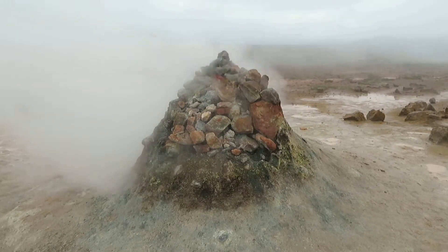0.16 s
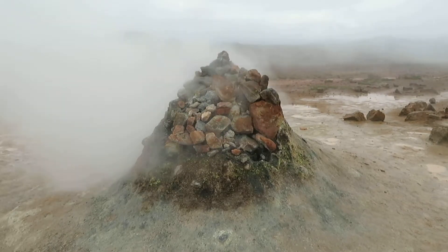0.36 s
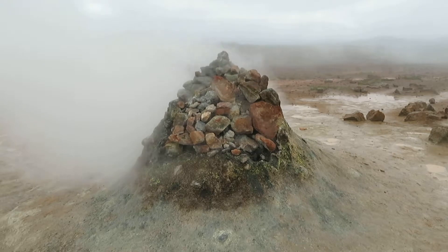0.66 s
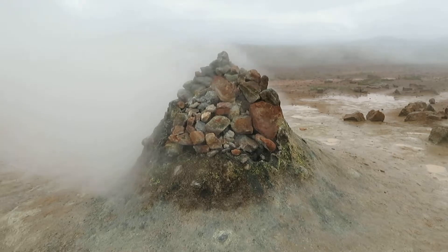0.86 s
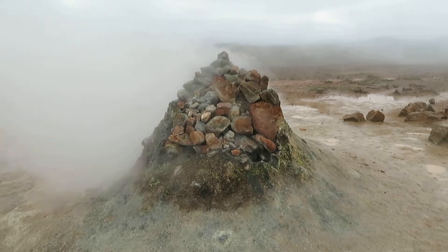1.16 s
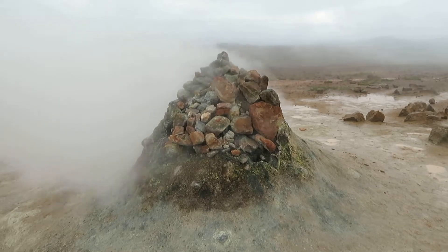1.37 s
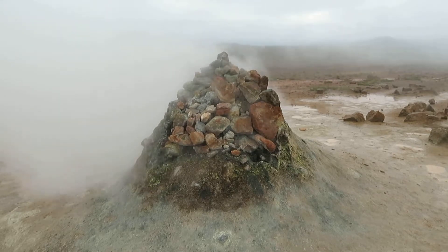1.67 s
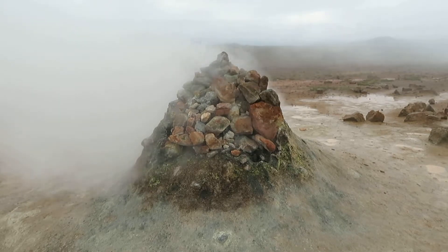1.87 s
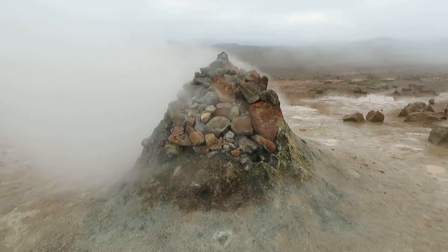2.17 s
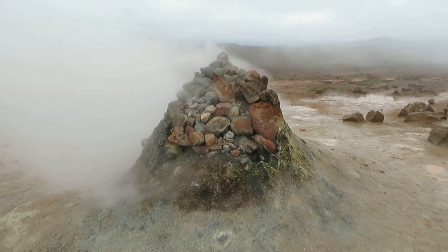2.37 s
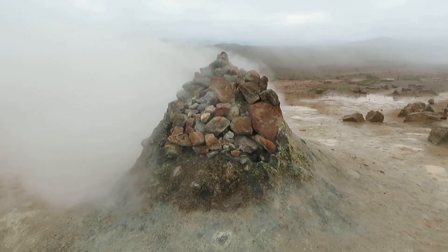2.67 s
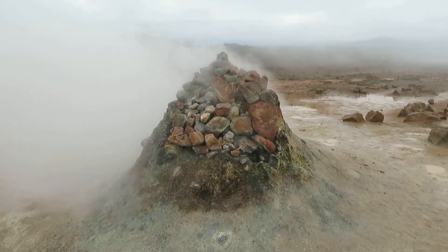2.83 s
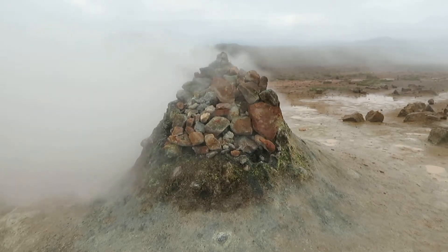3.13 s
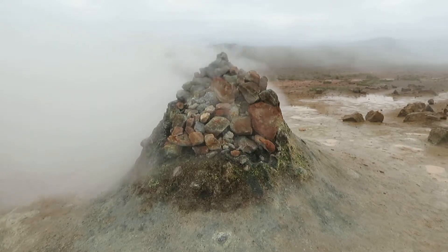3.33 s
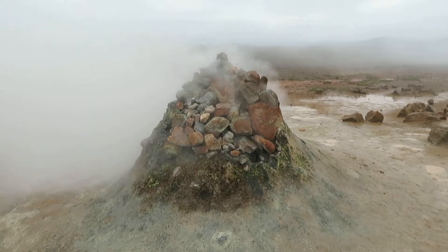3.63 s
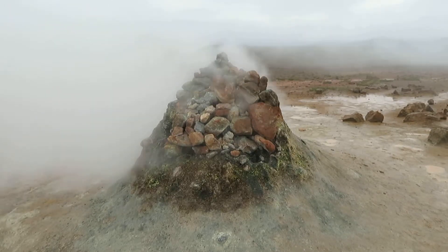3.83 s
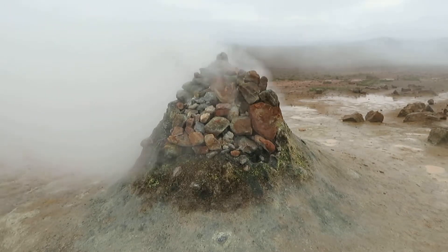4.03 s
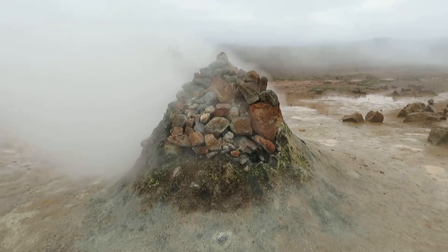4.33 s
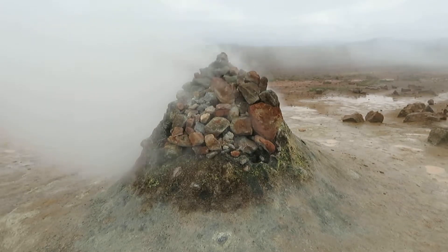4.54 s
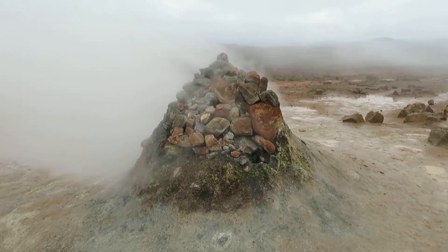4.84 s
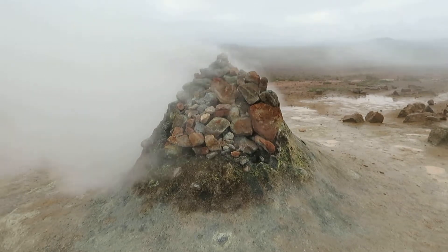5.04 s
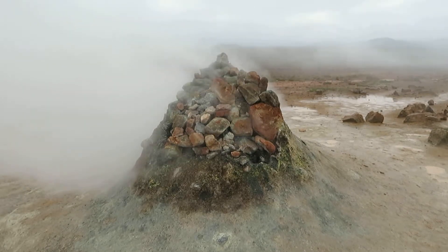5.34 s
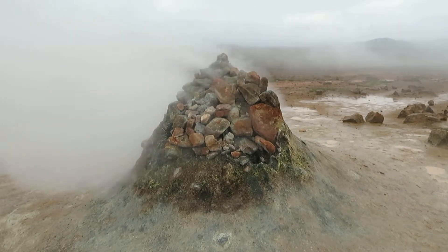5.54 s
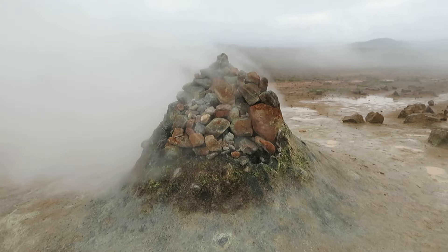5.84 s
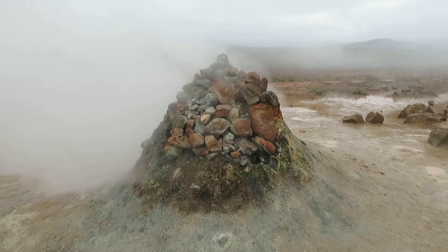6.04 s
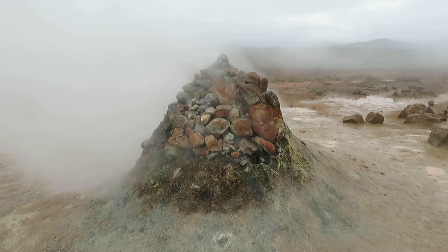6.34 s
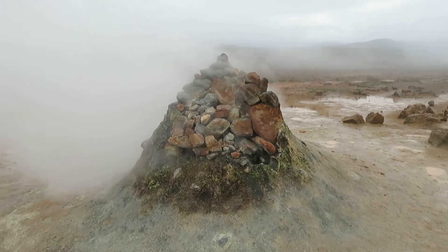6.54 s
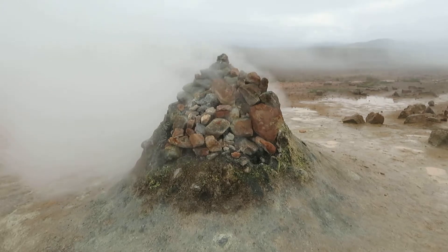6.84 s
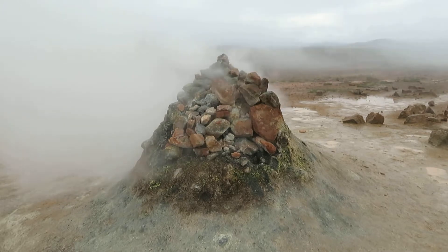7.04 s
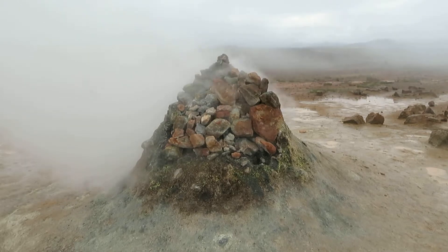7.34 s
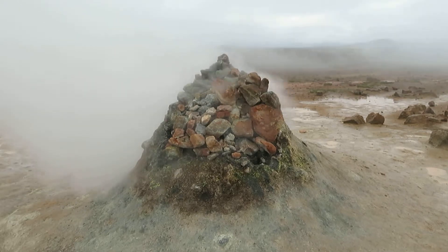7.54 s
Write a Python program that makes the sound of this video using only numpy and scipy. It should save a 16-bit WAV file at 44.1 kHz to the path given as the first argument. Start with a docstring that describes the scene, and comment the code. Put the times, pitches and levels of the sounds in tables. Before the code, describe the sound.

A steady rush of steam escapes between stones, heard close by in the open air. The hollow midrange roar drifts a little in pitch, and fine hiss surges irregularly above it. Deep wind rumble and buffeting press on the microphone throughout, with stronger fluttering gusts after five and near seven seconds. Two dry drop clicks come quickly together slightly after three seconds. Wide stereo, no reverberation.

```python
"""Fumarole under a cairn

A fumarole vents through a cairn of stones, heard from a few metres away on open, windy ground.
The wind buffets the microphone: noise in three bands, each following its own level curve.
The shaft roars, its noise raised at hollow resonances; steam hisses in surges between the stones
under a fine fizz, both made of shaped noise. A few drops of condensed steam tap on the housing
of the microphone: decaying modes, coloured by the contact, one rebound and the struck spot."""
import sys
import numpy as np
from scipy import signal
from scipy.fft import rfft, irfft, next_fast_len
from scipy.io import wavfile
from scipy.ndimage import uniform_filter1d, map_coordinates

SR = 44100
rng = np.random.default_rng(int(sys.argv[2]) if len(sys.argv) > 2 else 0)


def master_out(mix):
    """Clip the mix to full scale and print it as 16-bit PCM to the path in sys.argv[1]."""
    frames = np.transpose(np.atleast_2d(mix))
    ceiling = np.clip(frames, -1, 1)
    pcm = np.round(ceiling * 32767).astype(np.int16)
    wavfile.write(sys.argv[1], SR, pcm)


N = 339570


def amp(db):
    """Level: decibels to an amplitude ratio."""
    return 10 ** (np.asarray(db) / 20)


def unit(x):
    """Normalisation: scale to an rms of 1."""
    return x / np.sqrt(np.mean(x ** 2) + 1e-20)


def along(points, hz):
    """Log-frequency interpolation: each column of a table after the frequency, read at hz."""
    f, *columns = np.transpose(points)
    return [np.interp(np.log(hz + 1), np.log(f + 1), column) for column in columns]


def curves(rows):
    """Linear interpolation in time: one value per sample for each column after the time."""
    s, *columns = np.transpose(rows)
    return [np.interp(np.arange(N) / SR, s, column) for column in columns]


def wobble(rate):
    """Random modulation: a smooth curve through normal random knots, rate knots a second."""
    knots = rng.standard_normal(int(N * rate / SR) + 4)
    return map_coordinates(knots, [np.arange(N) * rate / SR])


def filtered(x, response):
    """Linear filtering: the spectrum of x times a response of frequency."""
    size = x.shape[-1]
    m = next_fast_len(size + SR // 2)
    spectrum = rfft(x, m) * response(np.fft.rfftfreq(m, 1 / SR))
    return irfft(spectrum, m)[..., :size]


def rush(spectrum, image, patchy_db, steady_s=.15):
    """Turbulence noise: stereo, evened to rms 1 over about steady_s; eddies make its gain patchy."""
    z = signal.stft(rng.standard_normal((2, N)), nperseg=512)[2]
    field = rng.standard_normal(z.shape[1:])
    field = uniform_filter1d(field, size=8, axis=0)  # across frequency
    field = uniform_filter1d(field, size=12, axis=1)  # across time
    pair = signal.istft(z * amp(patchy_db * unit(field)), nperseg=512)[1][:, :N]

    def mix(hz):
        """Partial correlation: shares of a common and an opposed noise set the likeness of the sides."""
        half_turn = np.arccos(np.clip(along(image, hz)[0], 0, 1)) / 2
        return amp(along(spectrum, hz)[0]) * [np.cos(half_turn), np.sin(half_turn)]

    def ports(hz):
        """Interaural-style differences: phase lead and level, half on each side."""
        _, lead, balance_db = along(image, hz)
        left = amp(balance_db / 2) * np.exp(.5j * lead)
        return np.array([left, 1 / left])

    shared, apart = filtered(pair, mix)
    noise = filtered(np.array([shared + apart, shared - apart]), ports)
    span = max(int(steady_s * SR), 2)
    power = uniform_filter1d(np.mean(noise ** 2, axis=0), span)
    power = uniform_filter1d(power, span)
    return noise / np.sqrt(np.abs(power) + 1e-20)


# levels of the large slow eddies, the buffeting and the sharp gusts, before trim:
# (time [s], level [dB])
EDDY_LEVELS = [(0.0, -30), (0.4, -33), (0.6, -31), (0.85, -28), (1.12, -28), (1.3, -30), (1.87, -28.5),
               (2.15, -31), (2.4, -26), (2.6, -31.5), (3.1, -29.5), (3.38, -36.5), (3.58, -28.5),
               (4.0, -31), (4.15, -30.5), (4.85, -27), (5.05, -28), (5.66, -25.5), (5.8, -31), (6.2, -31),
               (6.5, -30.5), (6.77, -25), (6.92, -36), (7.05, -25), (7.47, -31.5), (7.64, -25), (7.7, -28)]
BUFFET_LEVELS = [(0.0, -23.5), (0.19, -19.5), (0.33, -24), (0.53, -20), (0.7, -22.5), (1.15, -23.5),
                 (1.35, -25.5), (1.72, -22.5), (1.86, -22), (2.0, -23), (2.27, -23), (2.42, -20.5),
                 (2.8, -22), (3.0, -21), (3.22, -21), (3.45, -23), (3.6, -21.5), (4.1, -22), (4.65, -23),
                 (4.77, -20), (5.02, -24.5), (5.12, -20), (5.3, -24.5), (5.52, -21.5), (5.72, -22),
                 (5.87, -20), (6.05, -24), (6.25, -25.5), (6.5, -22), (6.75, -20), (6.84, -24.5),
                 (6.93, -18), (7.11, -20.5), (7.27, -20.5), (7.55, -19.5), (7.7, -21.5)]
GUST_LEVELS = [(0.0, -28), (0.28, -29.5), (0.55, -29.5), (0.82, -25), (1.0, -29.5), (1.17, -26),
               (1.33, -30.5), (1.55, -27.5), (1.77, -31.5), (1.92, -27.5), (2.24, -31), (2.52, -25.7),
               (2.8, -26.5), (3.1, -31.5), (3.25, -25), (3.78, -29.5), (3.95, -25), (4.1, -29), (4.33, -25),
               (4.52, -30.5), (4.7, -25.5), (4.88, -30), (5.12, -21), (5.22, -30), (5.32, -23),
               (5.45, -27.5), (5.63, -25.5), (6.0, -27.5), (6.33, -27), (6.46, -25), (6.8, -25),
               (6.93, -25), (7.1, -21.5), (7.3, -22), (7.55, -25.5), (7.7, -24)]
# relative spectra of the three bands: (frequency [Hz], level [dB])
RUMBLE_SPECTRUM = [(10, -21.5), (22, -15), (45, -7), (65, -3.5), (85, -0.5), (105, -8), (140, -35.5),
                   (500, -120)]
BUFFET_SPECTRUM = [(50, -23), (80, -11.5), (100, -2.5), (118, 0.5), (150, -1.5), (205, -2.5), (245, -7.5),
                   (300, -14.5), (500, -45.5), (1700, -120)]
FLUTTER_SPECTRUM = [(120, -30), (200, -7.5), (255, -0.5), (320, -2), (440, -8), (600, -19.5), (850, -23.5),
                    (1100, -28), (1400, -44), (2500, -74), (6000, -120)]
# stereo image of the wind:
# (frequency [Hz], left-right likeness [0 to 1], left lead [rad], left-right difference [dB])
WIND_STEREO = [(30, 0.995, 0, 0.3), (70, 0.99, 0, 1), (115, 0.91, -0.12, 2), (162, 0.79, -0.6, 2.1),
               (246, 0.9, -1.13, 0.5), (340, 0.73, -1.58, -0.3), (460, 0.79, -1.78, -0.5),
               (1110, 0.83, -3, -2.5)]
RUMBLE_TRIM_DB, BUFFET_TRIM_DB, FLUTTER_TRIM_DB = 0.7, -0.82, -1.17


def wind():
    """Eddy scales: large eddies rumble, smaller ones buffet and sharp gusts flutter at higher pitch."""
    eddy_db, = curves(EDDY_LEVELS)
    buffet_db, = curves(BUFFET_LEVELS)
    gust_db, = curves(GUST_LEVELS)
    rumble = rush(RUMBLE_SPECTRUM, WIND_STEREO, patchy_db=0.5, steady_s=0.14)
    buffet = rush(BUFFET_SPECTRUM, WIND_STEREO, patchy_db=0.04, steady_s=0.18)
    flutter = rush(FLUTTER_SPECTRUM, WIND_STEREO, patchy_db=1.55, steady_s=0.12)
    return (amp(eddy_db + RUMBLE_TRIM_DB) * rumble
            + amp(buffet_db + BUFFET_TRIM_DB) * buffet
            + amp(gust_db + FLUTTER_TRIM_DB) * flutter)


# flow in the shaft, roar before trim and wobble: (time [s], level [dB])
SHAFT_LEVELS = [(0.0, -35), (1.65, -34.5), (2.35, -36.5), (3.1, -34), (3.45, -36.5), (3.9, -32.5),
                (4.15, -35), (4.9, -34), (6.0, -35.5), (6.32, -34), (6.6, -35), (7.25, -35.5), (7.7, -36.5)]
# hollow notes of the shaft, before drift and swing:
# (frequency [Hz], width at half amplitude [Hz], level over the broad roar [dB])
HOLLOW_NOTES = [(525, 51, 5), (680, 44, 2.4), (780, 56, 3.5)]
# relative spectrum of the broad roar: (frequency [Hz], level [dB])
ROAR_SPECTRUM = [(200, -24), (400, -8), (480, -1.5), (580, 0.5), (640, -4), (735, -7.5), (850, -9),
                 (950, -14), (1050, -27), (1250, -30), (2500, -73), (5000, -120)]
# stereo image of the roar:
# (frequency [Hz], left-right likeness [0 to 1], left lead [rad], left-right difference [dB])
ROAR_STEREO = [(466, 0.71, -2, -2), (522, 1, 0.1, -3.5), (577, 0.69, -0.8, -4), (681, .35, -0.8, -9),
               (716, 0.3, -3, -6), (800, .35, -2.5, -7.5), (893, 0.37, -3, -2.5), (964, 0.83, -3, 5),
               (1060, 0.72, -3.5, 0)]
NOTE_SWING_DB, NOTE_KNOTS_PER_S = 1.2, 22
DRIFT_SHARE, DRIFT_KNOTS_PER_S = .016, 6  # share of the pitch


def shaft():
    """Resonance: rushing steam roars and sounds the shaft's hollow notes, which drift, swell and fade."""
    roar_db, = curves(SHAFT_LEVELS)
    broad = rush(ROAR_SPECTRUM, ROAR_STEREO, patchy_db=1.8, steady_s=0.077)
    roar = broad.copy()
    for centre, width, db in HOLLOW_NOTES:
        note = filtered(broad, lambda hz: 1 / (1 + ((hz - centre) / (width / 2)) ** 2))
        note_db = db + NOTE_SWING_DB * wobble(NOTE_KNOTS_PER_S)
        roar += (amp(note_db) - 1) * note  # the broad roar already holds the note once
    # reading at an uneven pace bends the pitch of the whole roar
    clock = np.cumsum(1 + DRIFT_SHARE * wobble(DRIFT_KNOTS_PER_S))
    drifting = np.array([map_coordinates(side, [clock], order=3, mode="mirror") for side in roar])
    return amp(roar_db - 0.33 + 1.63 * wobble(55)) * unit(drifting)


# surges between the stones, hiss before trim and sputter: (time [s], level [dB])
SURGE_LEVELS = [(0.0, -41), (0.06, -44.5), (0.15, -39.4), (0.26, -45.5), (0.36, -43), (0.5, -47),
                (0.65, -41.5), (0.73, -42.8), (0.86, -44), (1.05, -44), (1.16, -42), (1.38, -43.5),
                (1.61, -43.5), (1.7, -46), (1.78, -44), (1.96, -45.3), (2.2, -44.5), (2.28, -44),
                (2.4, -42.5), (2.5, -44), (2.98, -42.5), (3.14, -45.5), (3.46, -45), (3.69, -42),
                (3.83, -42), (4.0, -45), (4.23, -41), (4.38, -46.5), (4.47, -42), (4.65, -44.5),
                (4.77, -42), (4.95, -44), (5.09, -43), (5.61, -43), (5.71, -45), (6.15, -43), (6.33, -44),
                (6.47, -43.5), (6.6, -45.5), (6.94, -43), (7.06, -44.5), (7.16, -41.5), (7.34, -44.5),
                (7.7, -45)]
# relative spectra of the jets and the fizz: (frequency [Hz], level [dB])
HISS_SPECTRUM = [(800, -46.5), (1120, -7), (1300, -4), (1420, -8.5), (1590, 0.5), (1900, -2), (2400, -1.95),
                 (2560, -5), (2850, -2.5), (3200, -11.5), (3450, -7.5), (3800, -12), (4300, -8),
                 (5000, -12.5), (5700, -33), (8000, -73.5)]
FIZZ_SPECTRUM = [(4000, -24.5), (5400, 1), (7400, -4.5), (9100, -8), (10500, -10.5), (13000, -16),
                 (15000, -22)]
# stereo images of the jets and the fizz:
# (frequency [Hz], left-right likeness [0 to 1], left lead [rad], left-right difference [dB])
HISS_STEREO = [(1150, .8, 3, 0.5), (1260, 0.28, 1.5, 7.5), (1330, 0.96, -0.25, 7), (1410, .45, 2, 2),
               (1534, 0.75, 1, 8.5), (1620, 0.87, 0.83, 6), (1800, 1, 0.1, -0.5), (2020, 1, -0.4, 2),
               (2200, 0.99, 1.3, 0.5), (2480, 1, -0.86, 0.5), (3000, 0.97, 0.5, 0), (3300, 0.76, 0.46, 2.5),
               (3660, 0.87, 0.2, 0.5), (4270, 0.83, 1.03, 2.4), (4950, 0.87, 0.3, 1)]
FIZZ_STEREO = [(5900, 0.3, .3, 0.002), (7200, .23, 0, 0.0032), (10000, .42, 0, 0), (15000, .65, 0, 0)]


def steam():
    """Jet noise: jets between the stones surge and sputter; a fine fizz follows them only weakly."""
    hiss_db, = curves(SURGE_LEVELS)
    sputter_db = 0.67 * wobble(40)
    jets = rush(HISS_SPECTRUM, HISS_STEREO, patchy_db=1.14, steady_s=0.091)
    fizz = rush(FIZZ_SPECTRUM, FIZZ_STEREO, patchy_db=1.1, steady_s=.2)
    surge_db = hiss_db - hiss_db.mean() + sputter_db
    return amp(hiss_db + 0.4 + sputter_db) * jets + amp(-62.0 + .2 * surge_db) * fizz


# drops on the housing: (time [s], peak level [dB], brightness [dB per octave], rebound delay [s],
# region that the struck spot favours [Hz], its gain [dB], region that it mutes [Hz], its gain [dB])
DROP_TAPS = [(0.8511, -31, 9, 0.0019, 2100, 0, 4000, -7), (3.2839, -3.5, 0, 0.00154, 1850, 1, 4020, -1),
             (3.3706, -10.5, 3, 0.0012, 2030, 8, 4000, -7), (7.3293, -35, 10, 0.0014, 2100, 0, 4000, -6)]
# modes of the housing, before brightness and strike:
# (frequency [Hz], level [dB], 60 dB decay time [s], left lead [rad], left-right difference [dB])
HOUSING_MODES = [(1110, -7.5, 0.0011, -1.5, -7), (1420, -5, 0.0048, 1.32, -8.5),
                 (2180, -5.5, 0.0037, 0.1, 4.5), (2506, -6.5, 0.0049, 0.5, -7),
                 (3250, -5.5, 0.0017, 3.5, 3.5), (4880, -6, 0.0048, 2.58, 2.6),
                 (5430, -10.5, 0.0044, 3, -4.5), (6740, -11.5, 0.0018, 2, 3.9), (7660, -12, 0.003, 3, -6),
                 (9070, -12.6, .002, 3.5, 4.3)]
CONTACT_S, REBOUND_SHARE = .0000256, 0.24
REGION_OCTAVES, RADIATES_ABOVE_HZ = 0.193, 980


def drops():
    """Modal ringing: each drop rings the housing for milliseconds and rebounds once; tiny ones are brighter."""
    out = np.zeros((2, N + SR))
    t = np.arange(SR // 20) / SR
    sides = np.array([[.5], [-.5]])  # left, right
    margin = SR // 100
    lowest_hz = HOUSING_MODES[0][0]
    for s, db, bright_db, rebound_s, knock_hz, knock_db, node_hz, node_db in DROP_TAPS:
        ring = 0
        for k, (hz, level, t60, lead, balance_db) in enumerate(HOUSING_MODES):
            gain = amp(level + sides * balance_db + bright_db * np.log2(hz / lowest_hz))
            decay = np.exp(-np.log(1000) * t / t60)
            # neighbouring modes swing in opposite senses, so they join into one broad knock
            ring = ring + (-1) ** k * gain * decay * np.sin(2 * np.pi * hz * t + sides * lead)

        def strike(hz):
            """Excitation: soft contact dulls, rebound hollows, the spot colours; little bass radiates."""
            contact = np.exp(-.5 * (2 * np.pi * hz * CONTACT_S) ** 2)
            rebound = 1 + REBOUND_SHARE * np.exp(-2j * np.pi * hz * rebound_s)
            near = lambda centre: np.exp(-(np.log2((hz + 1) / centre) / REGION_OCTAVES) ** 2)
            spot = amp(knock_db * near(knock_hz) + node_db * near(node_hz))
            radiated = 1 / np.sqrt(1 + (RADIATES_ABOVE_HZ / (hz + 1)) ** 10)
            return contact * rebound * radiated * spot

        tap = filtered(np.pad(ring, ((0, 0), (margin, 0))), strike)
        start = round(s * SR) - margin
        out[:, start:start + tap.shape[1]] += amp(db) * tap / np.abs(tap).max()
    return out[:, :N]


def scene():
    """Superposition in a free field: the sources add, and open ground returns no echo."""
    return wind() + shaft() + steam() + drops()


TOP_HZ = 15300


def record(dry):
    """Band limiting: nothing from TOP_HZ upwards is kept."""
    margin = SR // 10  # mirrored ends keep the filter from ringing at the edges
    extended = np.pad(dry, ((0, 0), (margin, margin)), mode="reflect")
    return filtered(extended, lambda hz: hz < TOP_HZ)[:, margin:-margin]


dry = scene()
out = record(dry)
master_out(out)
```